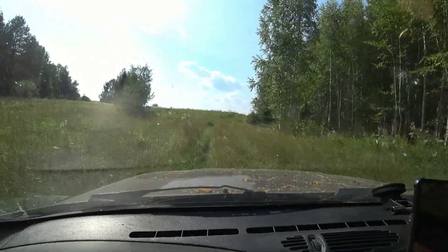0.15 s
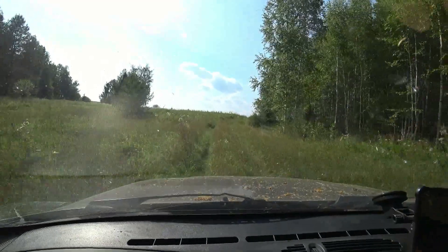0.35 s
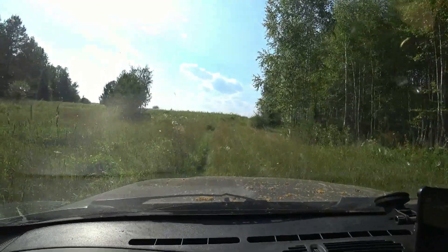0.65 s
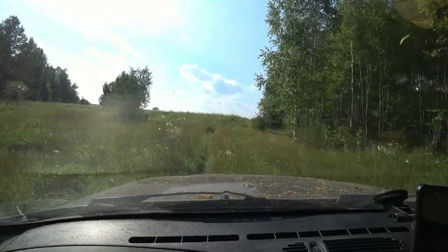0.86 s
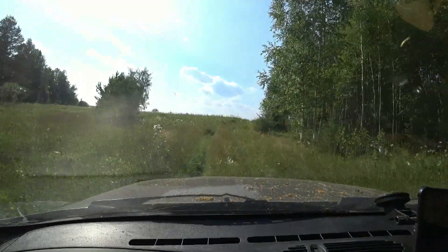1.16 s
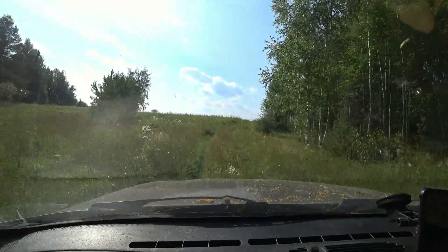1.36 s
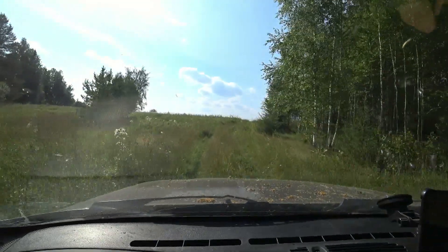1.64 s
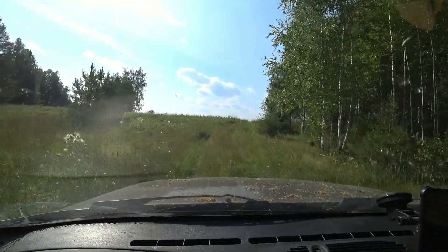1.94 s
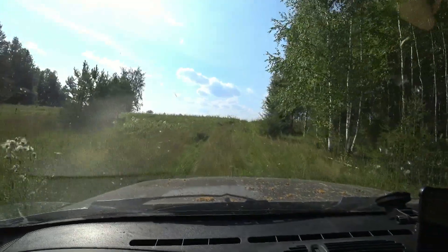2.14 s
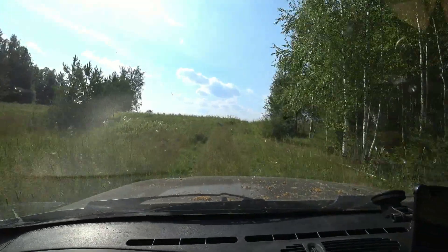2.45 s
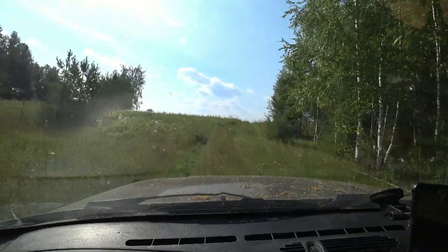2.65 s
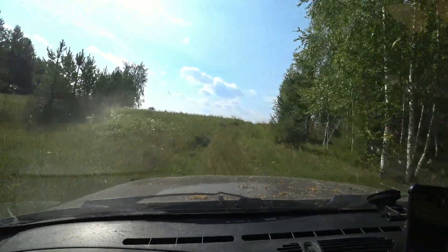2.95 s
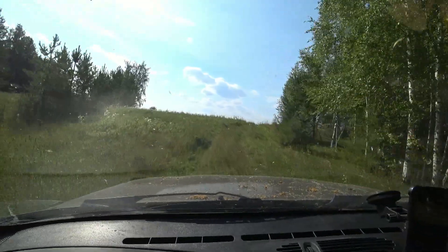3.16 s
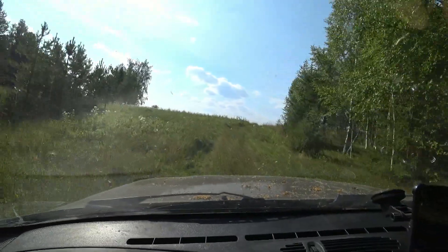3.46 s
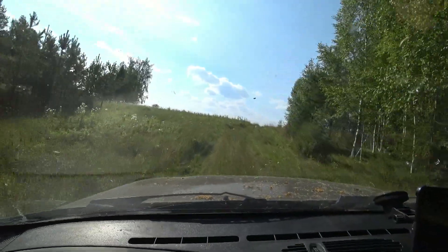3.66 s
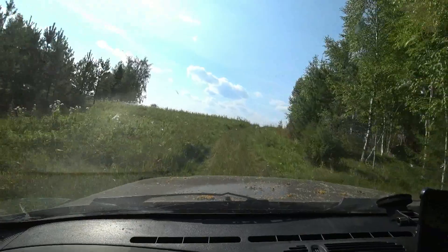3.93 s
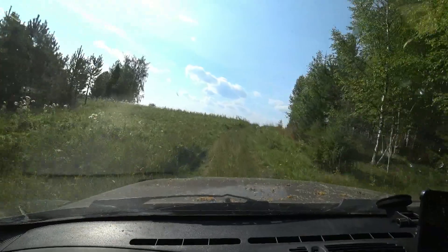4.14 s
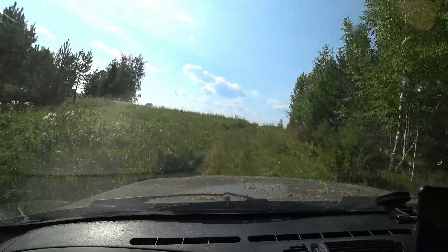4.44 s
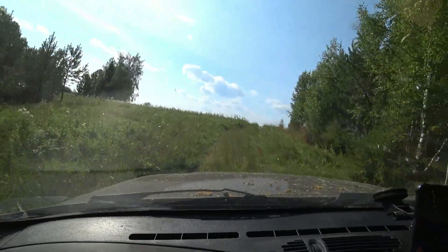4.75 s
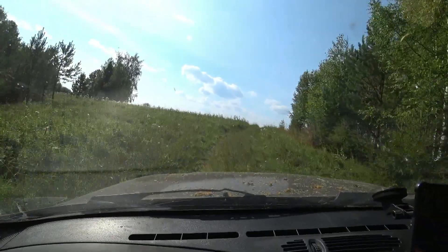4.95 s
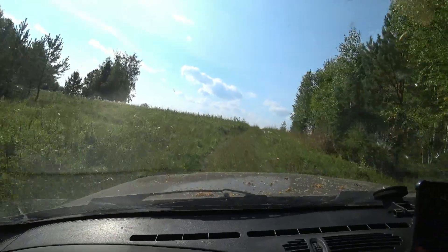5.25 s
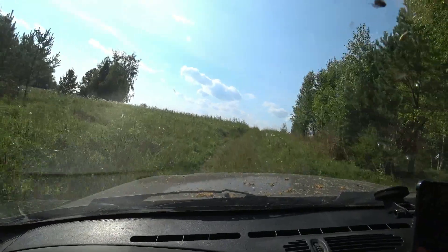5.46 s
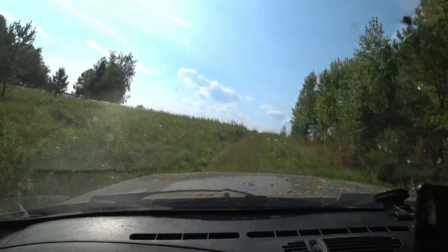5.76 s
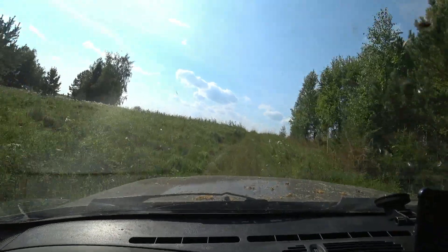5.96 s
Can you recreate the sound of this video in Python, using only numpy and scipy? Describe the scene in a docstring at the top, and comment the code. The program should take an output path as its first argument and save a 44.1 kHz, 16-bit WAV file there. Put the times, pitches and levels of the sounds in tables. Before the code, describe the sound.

Heard from the dashboard of a car creeping along a grassy track. A hard knock opens the scene while trim squeaks high and thin for under half a second. A deep engine boom lugs on with a wavering gear hum that fades midway and returns. Irregular knocks, dry clacks and plastic rattles continue over soft tyre rumble and faint grass swish.

```python
"""Inside an off-road car crawling along a bumpy grass track, its engine lugging at low revs.
It opens on hard knocks of a loose part, built from ringing body modes, while trim squeaks in stick-slip chirps.
The squeak lets go early; firing tones boom on and the modulated gear hum fades while the revs are lowest.
The hum then returns, and knocks, clacks of loose fittings and rattles of trim go on to the end.
Throughout, shaped noise makes the tyres rumble and roar and the grass swish."""
import sys
import numpy as np
from scipy import signal
from scipy.io import wavfile

SR = 44100
rng = np.random.default_rng(int(sys.argv[2]) if len(sys.argv) > 2 else 0)


def transcribe(u):
    """Save the signal u as a 16-bit wav file named by the first command-line argument.

    u: samples, shape (n,) or (channels, n), limited to [-1, 1]; the rate is SR.
    q: integer samples, one column per channel.
    """
    v = np.clip(np.atleast_2d(u).T, -1, 1)
    q = np.round(v * 32767).astype(np.int16)
    wavfile.write(sys.argv[1], SR, q)


N = 269010
TIME = np.arange(N) / SR  # s

# Table levels are relative: the functions add their own gains.
# engine speed: (time [s], firing rate [Hz])
FIRING_RATE = [(0.0, 36.56), (0.249, 34.84), (0.747, 34.28), (1.398, 31.98), (2.1, 30.65), (2.499, 29.96),
               (3.3, 30.13), (4.001, 31.9), (4.85, 33.94), (5.4, 32.77), (5.8, 32.73), (6.1, 30.95)]
# engine boom in the cabin: (time [s], level at the firing rate [dB], level of its octave [dB])
ENGINE_LEVELS = [(0.0, -27.5, -24), (0.45, -17.5, -39), (0.7, -29, -38), (1.15, -19, -27.5),
                 (1.5, -26.5, -24.5), (2.0, -21.5, -21.5), (2.55, -19, -18.5), (3.0, -15.5, -19),
                 (3.8, -18, -20.5), (4.7, -17, -27), (5.3, -16.5, -26), (5.55, -18.5, -27.5),
                 (6.1, -18.5, -19.5)]
# brief dips of the engine: (time [s], depth [dB])
ENGINE_DIPS = [(0.202, 11), (.36, 12), (.7, 0), (1.03, 5), (1.27, 4), (1.812, 4), (1.91, 6), (2.048, 3.5),
               (4.88, 7), (5.36, 15)]
# rocking of the engine: (multiple of the firing rate [ratio], level [dB])
ROCKING_ORDERS = [(.88, -32.5), (1.14, -31), (1.269, -29), (1.481, -37), (1.619, -35.5)]
# gear hum: (time [s], level [dB], throb depth [0-1], slow phase sway depth [rad])
GEAR_HUM = [(0, -32, 0.8, 0.27), (.35, -32.5, 0.5, 0.47), (1.25, -25, 0.5, .2), (1.65, -24.5, 0.04, 0.17),
            (2.22, -27, 0.6, 0.25), (2.36, -34, 0.53, 0.5), (3.2, -38.5, 0.85, 0.56),
            (3.6, -31, 0.62, 0.17), (4.4, -28.5, 0.51, 0.27), (5.75, -25.5, 0.42, 0.8),
            (6.1, -31, 0.6, 1.5)]
# knocks: (time [s], peak [dB], edge re peak [dB], thud re peak [dB], ring brightness [dB per octave])
BODY_KNOCKS = [(0.013, -7, -24, -11, 0), (0.045, -15, -27, -8, -13.5), (0.234, -23.5, -19, -21, 2.5),
               (0.84, -8.5, -25.5, -11.5, -1.5), (0.934, -26, -28, -26, -7.5),
               (1.433, -10.5, -22.5, -7.5, 1.2), (1.85, -26.5, -35, -6, -4), (2.133, -24.5, -24, 1, -1),
               (2.157, -27.5, -30, -14, 1), (2.307, -25.5, -39, -17, -7), (2.445, -19.5, -26, -8, -2),
               (2.944, -15, -28, -7, -2.5), (3.102, -17.5, -33, -16, -3), (3.202, -23.5, -32, -13, -2),
               (3.804, -25, -34, -3.5, -.3), (3.862, -27.5, -43, -10, -2), (4.475, -14.5, -30, -8.5, -2.5),
               (4.737, -27, -46, -34, -1), (4.831, -26, -19, -3, 3), (4.872, -24.5, -40, -7, 1),
               (4.978, -16.5, -30, -9, -2.5), (5.391, -15, -33, -13, -1), (5.693, -10, -22.5, -11, -1),
               (5.712, -18, -33, -12, -1), (5.803, -12.5, -21.5, -10, 0.3), (5.822, -23, -29, -18, -6)]
# body panel modes: (frequency [Hz], level [dB], T60 [s])
BODY_MODES = [(342, -14.5, 0.32), (395.3, -6.5, .12), (412.3, -7.5, .19), (442, -4.5, 0.11), (502, -9, .12),
              (524, -9, 0.029), (545.2, -9.5, 0.15), (625, -13.5, .12), (662, -22.5, .11),
              (742, -30.5, 0.12), (952, -19.5, 0.14), (1025, -14, 0.084), (1068, -17, 0.056),
              (1140, -21, .022), (1250, -19.5, 0.086), (1335, -22.5, 0.099), (1390, -38, 0.056),
              (1720, -26, 0.086), (1900, -32, 0.11), (2034, -25.5, .08), (2144, -30, 0.072)]
# low thud modes of the body: (frequency [Hz], level [dB], T60 [s])
THUD_MODES = [(154.8, -2.5, 0.41), (189.7, 1.5, 0.18), (233, -1, 0.035)]
# spectrum of the knocks' cabin tail: (frequency [Hz], density [dB per Hz])
TAIL_SPECTRUM = [(200, -36), (330, -4.5), (420, 5), (560, 13.5), (780, -17.5), (1020, -0.5), (1350, -3),
                 (1700, -18), (2100, -14.5), (2700, -27)]
# spectrum of the knocks' hard edge: (frequency [Hz], density [dB per Hz])
EDGE_SPECTRUM = [(900, 9), (1500, 8), (2100, -30), (2600, 5), (3200, 11.5), (4200, 11), (5200, 2.5),
                 (6800, 4), (8500, -16), (11000, -25)]
# decay of the cabin: (frequency [Hz], T60 [s])
CABIN_DECAY = [(200, 0.24), (500, 0.27), (1100, 0.17), (2500, 0.15), (8000, .07)]
# clacks of loose fittings: (time [s], level [dB], brightness [dB per octave])
FITTING_CLACKS = [(.265, -38, 1), (.336, -45, 3), (.484, -34, 1.5), (.699, -37.5, 6.5), (.751, -29, -3),
                  (.995, -45, 6.5), (2.104, -38.5, 4), (2.335, -48, 2), (2.904, -38, 2), (3.627, -37, .5),
                  (4.849, -32, 2), (5.290, -33, 1), (5.348, -32, 0.5), (5.861, -35, -2),
                  (6.008, -33.5, 3.5)]
# modes of the fittings: (frequency [Hz], level [dB], T60 [s])
FITTING_MODES = [(474, -3.5, 0.044), (650, -1.5, 0.04), (915, -3, 0.031), (1074, -2.5, 0.026),
                 (1265, -4, 0.037), (1508, -12, 0.045), (1774, -7, 0.019), (2270, -17, 0.018)]
# trim rattles: (time [s], level [dB], centre [Hz], width [Hz], T60 [s])
TRIM_RATTLES = [(.045, -44, 6500, 3000, .05), (.484, -50, 3700, 3000, 0.12), (0.692, -43, 4970, 4500, 0.18),
                (.756, -46, 5937, 1800, 0.055), (0.8777, -47.5, 2770, 701.6, 0.16),
                (1.502, -47.5, 6300, 2200, 0.03), (2.0121, -48.5, 3460, 700, 0.25),
                (2.042, -53, 3450, 890, 0.17), (2.146, -39.5, 3550, 500, 0.093),
                (2.15, -50, 5700, 1400, 0.3), (2.335, -41, 1520, 220, 0.12),
                (2.871, -38.5, 6297, 900, 0.05), (2.871, -44, 9000, 4030, 0.056),
                (2.875, -46, 2570, 690, 0.066), (2.904, -48, 6460, 2200, 0.046),
                (3.066, -49.5, 5000, 1800, 0.055), (3.557, -50, 5203, 2600, 0.048),
                (3.6266, -41, 3220, 900, 0.046), (4.129, -51.5, 6030, 2585, 0.084),
                (4.416, -51, 3285, 500, 0.13), (4.534, -58, 3380, 908, 0.035),
                (4.573, -46, 3390, 698.3, 0.027), (4.851, -43.5, 2870, 900, 0.075),
                (5.0458, -47, 2390, 900, 0.049), (5.231, -54.5, 3362, 1404, 0.25),
                (5.289, -43, 5203, 3400, 0.067), (5.35, -43, 2800, 1300, 0.076),
                (5.9, -51, 3940, 2400, .04), (6.007, -38.5, 2794, 450, 0.047),
                (6.009, -46, 3700, 1600, .05)]
# spectrum of the squeak's hiss: (frequency [Hz], density [dB per Hz])
SQUEAK_SPECTRUM = [(6000, -40), (7200, -17), (8500, 12), (9500, 16), (11000, -3), (14000, -5)]
# ground under the car: (time [s], body rumble [dB], tyre roar [dB], grass swish [dB])
GROUND_LEVELS = [(0.0, -27.5, -37, -51.5), (0.44, -31, -41.5, -52), (1.92, -33.5, -42.5, -55),
                 (2.38, -33, -42, -53.5), (2.92, -38, -43.5, -57), (4.01, -39.5, -43.5, -59),
                 (4.37, -33.5, -43, -58), (5.44, -36.5, -41.5, -57), (5.78, -35, -43, -59),
                 (6.1, -37, -41.5, -55.5)]
# spectrum of the body rumble: (frequency [Hz], density [dB per Hz])
RUMBLE_SPECTRUM = [(20, -19), (32, -8), (46, 5), (68, -17.5), (92, 2.5), (130, -2.5), (185, 0), (225, -1.5),
                   (260, -42), (330, -28), (450, -45)]
# spectrum of the tyre roar: (frequency [Hz], density [dB per Hz])
ROAR_SPECTRUM = [(200, -21), (290, 19.5), (340, 11), (420, 0.5), (500, 3), (640, 2), (800, -2.5),
                 (1000, -9.5), (1300, -12), (1700, -17), (2300, -25), (3200, -19)]
# spectrum of the grass swish: (frequency [Hz], density [dB per Hz])
SWISH_SPECTRUM = [(1000, 17.5), (1800, 6.5), (2600, 3), (3400, 3), (4800, 0.5), (6000, 4), (8000, -2),
                  (11000, -6), (14000, -26)]
# panels kept humming within the roar: (frequency [Hz], width [Hz], level [dB])
HUMMING_PANELS = [(409, 15.6, -13), (531, 29, -18.5), (684, 64, -12.5), (944, 250, -14), (2157, 200, -63),
                  (3370, 520, -26)]
# stereo likeness of noise: (frequency [Hz], likeness [0-1])
STEREO_LIKENESS = [(30, .99), (70, 1), (160, 0.74), (300, 0.63), (500, 0.35), (1000, 0.27), (3000, 0.54),
                   (9000, 0.47)]
# stereo balance: (frequency [Hz], left minus right [dB])
STEREO_BALANCE = [(30, -2.5), (70, -3), (180, -5.5), (330, -4.5), (600, -2), (1070, 0.5), (2000, .7),
                  (10000, 0.8)]
# stereo phase: (frequency [Hz], lead of the left [rad])
STEREO_LEAD = [(30, .04), (62, 0.19), (150, 0.56), (270, 1.51), (330, 0.61), (430, 0.72), (800, 0.33),
               (2000, 0.81)]

HALF_SPLIT = np.array([[.5], [-.5]])  # half of a stereo difference to each side

# waver of the boom: depth at its strongest (0-1), growth (dB per dB that the boom loses)
LOPE, LOPE_GROWTH = .08, 2.1
DIP_SPREAD_S = 0.027
# order just below the octave (per firing); phase wander as rates of drift and radians
BEAT_ORDER, BEAT_WANDER_PER_S, ROCKING_WANDER_RAD = 1.75, 1.2, 1.5
# gear hum: cycles per firing
MESH_PER_FIRING, SHAFT_TURNS_PER_FIRING, BEATS_PER_FIRING, SWAYS_PER_FIRING = 9.35, .239, .291, .112
FIRST_SWELL_S = 0.077
# slow wander in phase (rad); quick flutter in phase (rad) and level (share)
HUM_WANDER, HUM_FLUTTER = .45, .24
# bounces after each knock: spacing, its scatter (share), level, and changes to edge and thud
REBOUND_S, REBOUND_SCATTER, REBOUND_DB, BOUNCE_LOSS_DB = .017, 0.264, -21, 5.5
REBOUND_EDGE_DB, REBOUND_THUD_DB = -14, 13.5
# small random jolts; the tilt is the largest either way, per octave
JOLT_DB, JOLT_SPREAD_DB, JOLT_EDGE_DB, JOLT_THUD_DB, JOLT_TILT_DB = -34, 4, -35, -10, 2
FAINT_CLACK_DB, FAINT_CLACK_SPREAD_DB = -47, 3
# faint random ticks of the trim; their pitch spreads by the octaves either way
TICK_DB, TICK_SPREAD_DB, TICK_HZ, TICK_OCTAVES, TICK_WIDTH_HZ, TICK_T60_S = -56, 2.5, 4400, .7, 1800, .09
# the squeak grows steadily, then lets go
SQUEAK_START_DB, SQUEAK_END_DB, SQUEAK_END_S, SQUEAK_RELEASE_DB_PER_S = -48.5, -40, 0.448, 596
# each knock leaves the body shaking for a moment
SHUDDER_DB, SHUDDER_T60_S = -21, 0.6
TILT_PIVOT_HZ = 600
PEAK_LIMIT, FADE_S, CUTOFF_HZ = .85, .004, 11050  # the limit is in full scale


def engine(boom_gain_db=2.0, octave_gain_db=-2.0, shudder=0.22, beat_db=-12,
           overtone_db=-21, overtone_fall_db=4.0):
    """Slow firing pulses: a strong boom, a throbbing octave and weak, unsteady orders between and above them."""
    boom_db, octave_db = in_time(ENGINE_LEVELS)
    turn = firing_phase()
    hz = np.mean(np.array(FIRING_RATE)[:, 1])
    # the boom is firm under load and wavers more as it weakens
    waver = np.minimum(LOPE * from_db(LOPE_GROWTH * (boom_db.max() - boom_db)), 1)
    firmness = (1 + waver * (drift(25.6) + 1j * drift(12.0))) / np.sqrt(1 + 2 * waver ** 2)
    out = from_db(boom_db + boom_gain_db) * placed(firmness * np.exp(1j * turn), hz)
    # the octave throbs once in every four firings, against the order just below it
    lower_order = np.exp(1j * (BEAT_ORDER * turn + drift(BEAT_WANDER_PER_S)))
    octave = np.exp(2j * turn + 3j * np.pi / 4) + from_db(beat_db) * lower_order
    octave_level = from_db(octave_db + octave_gain_db) * (1 + shudder * drift(8.9))
    out += octave_level * placed(octave, 2 * hz)
    # unequal cylinders rock the engine on its mounts
    for multiple, db in ROCKING_ORDERS:
        strength = rms_one(abs(drift(3.9)) + 1)
        phase = multiple * turn + ROCKING_WANDER_RAD * drift(1.15)
        out += from_db(db) * placed(strength * np.exp(1j * phase), multiple * hz)
    for k in range(3, 8):
        level = from_db(octave_db + overtone_db - overtone_fall_db * (k - 3.5))
        out += level * drift(23.4) * placed(np.exp(1j * k * turn), k * hz)
    return np.sqrt(2) * from_db(-dip_db()) * out


def firing_phase():
    """Angle that advances one turn with each firing."""
    firing_hz, = in_time(FIRING_RATE)
    return 2 * np.pi * np.cumsum(firing_hz) / SR


def dip_db():
    """Level lost in the engine's brief, bell-shaped dips."""
    return sum(depth_db * np.exp(-.5 * ((TIME - s) / DIP_SPREAD_S) ** 2) for s, depth_db in ENGINE_DIPS)


def gearbox(level_db=0.0, beat=0.51, wobble=0.94, chatter_db=-41):
    """Gear teeth hum in step with the engine; an eccentric shaft swells the hum, against a faster beat."""
    mesh_db, throb, sway = in_time(GEAR_HUM)
    turn = firing_phase()
    shaft = SHAFT_TURNS_PER_FIRING * (turn - np.interp(FIRST_SWELL_S, TIME, turn))
    swell = 1 + throb * (np.cos(shaft) + beat * np.cos(BEATS_PER_FIRING * turn))
    # the drive winds up under load, so each shaft swell starts sharp and ends flat
    twist = wobble * throb * np.cos(shaft)
    twist -= sway * np.cos(SWAYS_PER_FIRING * turn)
    twist += HUM_WANDER * drift(1.55) + HUM_FLUTTER * drift(8.5)
    # the teeth chatter at a steady level, so the hum breaks up when it is weak
    hum = from_db(mesh_db + level_db) * swell * (1 + HUM_FLUTTER * drift(11.0))
    chatter = from_db(chatter_db) * (drift(16.6) + 1j * drift(16))
    mesh = np.exp(1j * (MESH_PER_FIRING * turn + twist))
    return np.sqrt(2) * placed((hum + chatter) * mesh, 273)


def knocks(ring_db=-2.5, thud_db=-2.5, clatter_db=-17.0, edge_db=-4, edge_t60=0.11, contact_s=0.00085):
    """A loose part hits the body and bounces: a hard edge, ringing panels, a low thud and a short cabin tail."""
    s, peak_db, hard_db, low_db, tilt_db = np.vstack([BODY_KNOCKS, *rebounds(count=2), jolts()]).T
    ring_s = s + contact_s
    panels = struck(BODY_MODES, ring_s, peak_db + ring_db, tilt_db, scatter_db=2.5, softness=1.88)
    thud = struck(THUD_MODES, ring_s, peak_db + low_db + thud_db, 0, scatter_db=1.5)
    hits = clicks(ring_s, from_db(peak_db + clatter_db))
    tail = noise(TAIL_SPECTRUM, lambda hz: dying(hits, at_hz(CABIN_DECAY, hz), rise_s=0.0011))
    crack = dying(clicks(s, from_db(peak_db + hard_db + edge_db)), edge_t60, rise_s=.0011)
    return panels + thud + tail + noise(EDGE_SPECTRUM, lambda hz: crack)


def rebounds(count):
    """Rows of knocks for each bounce: unevenly later, weaker, duller and with more thud."""
    rows = np.array(BODY_KNOCKS)
    gaps = REBOUND_S * (1 + REBOUND_SCATTER * rng.uniform(-1.03, 1, (len(rows), count)))
    bounces = []
    for k, delay in enumerate(np.cumsum(gaps, axis=1).T):
        later = np.outer(delay, [1, 0, 0, 0, 0])
        change = [0, REBOUND_DB - BOUNCE_LOSS_DB * k, REBOUND_EDGE_DB * (k + 1), REBOUND_THUD_DB, 0]
        bounces.append(rows + later + change)
    return bounces


def jolts(count=40):
    """Light, dull rows of knocks at random times: tufts and ruts nudge the same panels."""
    chance = rng.uniform([0, -1, -1], [N / SR, 1, 1], (count, 3))
    return [(s, JOLT_DB + JOLT_SPREAD_DB * size, JOLT_EDGE_DB, JOLT_THUD_DB, JOLT_TILT_DB * colour)
            for s, size, colour in chance]


def clacks(level_db=0.0, touch_s=0.0048, touch_loss_db=3.5, count=4):
    """Loose fittings jostle: each clack is a quick, uneven run of touches that ring their modes."""
    s, db, tilt_db = np.vstack([FITTING_CLACKS, faint_clacks()]).T
    touch = np.arange(count)
    times = s[:, None] + touch_s * touch * rng.uniform(.75, 1.25, (len(s), count))
    sizes_db = db[:, None] + level_db - touch_loss_db * touch
    tilts_db = np.repeat(tilt_db, count)
    return struck(FITTING_MODES, times.ravel(), sizes_db.ravel(), tilts_db, scatter_db=3.0, softness=1.6)


def faint_clacks(count=10):
    """Rows of clacks at random times, levels and brightness."""
    lowest = [0, FAINT_CLACK_DB - FAINT_CLACK_SPREAD_DB, -2]
    highest = [N / SR, FAINT_CLACK_DB + FAINT_CLACK_SPREAD_DB, 2]
    return rng.uniform(lowest, highest, (count, 3))


def rattles(level_db=2, touches_per_s=900, fizz=0.12, rise_s=0.00053, spread=0.46):
    """Pieces of plastic trim chatter in quick tiny touches, each through a resonance of its own."""
    count = SR // 4
    age = np.arange(count) / SR
    out = np.zeros((2, N + count))
    for s, db, centre_hz, width_hz, t60 in TRIM_RATTLES + faint_ticks():
        density = fizz + (rng.random(count) < touches_per_s / SR)
        touches = rng.standard_normal((2, count)) * density
        edges = [max(centre_hz - width_hz / 2, 100), centre_hz + width_hz / 2]
        resonance = signal.butter(2, edges, "band", fs=SR, output="sos")
        mid, side = signal.sosfilt(resonance, touches)
        envelope = from_db(db + level_db - 60 * age / t60) * (1 - np.exp(-age / rise_s))
        at = round(s * SR)
        out[:, at:at + count] += envelope * rms_one(widened(mid, spread * side))
    return out[:, :N]


def faint_ticks(count=7):
    """Rows of rattles at random times, levels and pitches."""
    chance = rng.uniform([0, -1, -1], [N / SR, 1, 1], (count, 3))
    return [(s, TICK_DB + TICK_SPREAD_DB * size, TICK_HZ * 2 ** (TICK_OCTAVES * pitch), TICK_WIDTH_HZ, TICK_T60_S)
            for s, size, pitch in chance]


def squeak(slips_per_s=52, unevenness=0.1, depth_db=5, chirp_hz=8900, chirp_wander_hz=700,
           chirp_db=-2, hiss_db=-3):
    """Rubbing trim sticks and slips in a run of tiny high chirps, each at a slightly different pitch."""
    level_db = np.interp(TIME, [0, SQUEAK_END_S], [SQUEAK_START_DB, SQUEAK_END_DB])
    level_db -= SQUEAK_RELEASE_DB_PER_S * np.clip(TIME - SQUEAK_END_S, 0, .5)
    slip = 2 * np.pi * np.cumsum(slips_per_s * (1 + unevenness * drift(30))) / SR
    strength = from_db(level_db + depth_db * (np.sin(slip) - 1.5))
    chirp = np.exp(2j * np.pi * np.cumsum(chirp_hz + chirp_wander_hz * drift(93)) / SR)
    hiss = noise(SQUEAK_SPECTRUM, lambda hz: from_db(hiss_db))
    return strength * (from_db(chirp_db) * placed(chirp, chirp_hz) + hiss)


def ground(rumble_gain_db=0, roar_gain_db=4, panel_gain_db=4, swish_gain_db=4,
           lumps_db=2.0, tufts_db=1.73, stalks_db=1.5):
    """Tyres shake the body and roar over tufts while grass brushes the underside."""
    rumble_db, roar_db, swish_db = in_time(GROUND_LEVELS)
    s, peak_db = np.transpose(BODY_KNOCKS)[:2]
    shudder = dying(clicks(s, from_db(peak_db + SHUDDER_DB)), SHUDDER_T60_S)
    shake = np.hypot(from_db(rumble_db), shudder)
    bumps = drift(27)  # shared, so all three layers surge together
    rumble = noise(RUMBLE_SPECTRUM, lambda hz: from_db(rumble_gain_db + lumps_db * bumps))
    roar = noise(ROAR_SPECTRUM, lambda hz: from_db(roar_gain_db + tufts_db * (bumps + 0.5 * drift(25))))
    roar += from_db(panel_gain_db + tufts_db * bumps) * humming_panels()
    swish = noise(SWISH_SPECTRUM, lambda hz: from_db(swish_gain_db + stalks_db * (0.67 * bumps + drift(5.1))))
    return shake * rumble + from_db(roar_db) * roar + from_db(swish_db) * swish


def humming_panels():
    """Random jolts, as white noise, keep the panel resonances sounding."""
    out = 0
    for hz, width_hz, db in HUMMING_PANELS:
        pole = np.exp((-np.pi * width_hz + 2j * np.pi * hz) / SR)
        # two broader poles in a row give steep skirts
        broad_pole = pole * abs(pole) ** .5
        wave = signal.lfilter([1], np.poly([broad_pole] * 2), rng.standard_normal(N))
        out = out + from_db(db) * rms_one(placed(wave, hz))
    return out


def struck(modes, times, peak_db, tilt_db, scatter_db, softness=2.4):
    """Each blow rings every mode at its own strength, tilted by brightness; a padded contact rounds the start."""
    out = 0
    for hz, mode_db, t60 in modes:
        colour_db = tilt_db * np.log2(hz / TILT_PIVOT_HZ) + scatter_db * rng.standard_normal(len(times))
        hits = clicks(times, from_db(peak_db + mode_db + colour_db))
        padding = signal.butter(3, softness * hz, fs=SR, output="sos")
        push = signal.sosfilt(padding, hits + 1e-18)
        pole = from_db(-60 / (t60 * SR)) * np.exp(2j * np.pi * hz / SR)
        out = out + placed(signal.lfilter([1], [1, -pole], push), hz)
    return out


def noise(spectrum, envelope):
    """Third-octave stereo noise, of unit power before each band is multiplied by envelope(Hz)."""
    edges = 18 * 2 ** (np.arange(30) / 3)
    white = rng.standard_normal((2, 2, N))  # two pairs, used by alternate bands
    out, power = 0, 0
    for k, (low, high) in enumerate(zip(edges, edges[1:])):
        hz = np.sqrt(low * high)
        if spectrum[0][0] <= hz <= spectrum[-1][0]:
            band = signal.butter(3, [low, high], "band", fs=SR, output="sos")
            mid, side = signal.sosfilt(band, white[k % 2])
            alike = np.clip(at_hz(STEREO_LIKENESS, hz), 0, 1)
            gain = from_db(at_hz(spectrum, hz))
            pair = widened(mid, np.sqrt((1 - alike) / (1 + alike)) * side)
            out = out + gain * envelope(hz) * pair * from_db(at_hz(STEREO_BALANCE, hz) * HALF_SPLIT)
            power += gain ** 2 * (high - low) * 2 / SR
    return out / np.sqrt(power)


def placed(wave, hz):
    """Standing waves in the cabin give a complex tone its own level and phase on each side."""
    level = from_db(HALF_SPLIT * at_hz(STEREO_BALANCE, hz))
    lead = np.exp(1j * HALF_SPLIT * at_hz(STEREO_LEAD, hz))
    return np.imag(wave * level * lead)


def widened(mid, side):
    """Left and right from a shared signal and a difference signal."""
    return mid + side * [[1], [-1]]


def dying(hits, t60, rise_s=.0015):
    """Envelope of hits that take a moment to build up and whose energy dies away exponentially."""
    soft = np.exp(-1 / (rise_s * SR))
    energy = signal.lfilter([1], [1, -from_db(-120 / (t60 * SR))], hits ** 2 + 1e-18)
    return signal.lfilter([1 - soft], [1, -soft], np.sqrt(energy))


def clicks(times, sizes):
    """One single-sample click at each time."""
    out = np.zeros(N)
    at = np.round(np.asarray(times) * SR).astype(int)
    np.add.at(out, np.clip(at, 0, N - 1), sizes)
    return out


def drift(rate):
    """Smooth random movement of unit power: noise through two low-pass poles at the rate in Hz."""
    # drawn at every 40th sample, with a run-in that is thrown away
    r = np.exp(-80 * np.pi * rate / SR)
    slow = signal.lfilter([1], [1, -2 * r, r * r], rng.standard_normal(N // 40 + 2002))[2000:]
    return np.interp(np.arange(N) / 40, np.arange(len(slow)), rms_one(slow))


def in_time(rows):
    """Each column of a curve at every sample."""
    s, *columns = np.transpose(rows)
    return [np.interp(TIME, s, c) for c in columns]


def at_hz(points, hz):
    """Read a table on a log-frequency axis."""
    table_hz, values = np.array(points).T
    return np.interp(np.log(hz), np.log(table_hz), values)


def from_db(db):
    """Decibels to gain."""
    return 10 ** (np.asarray(db) / 20)


def rms_one(x):
    """Scale to unit power."""
    return x / np.sqrt(np.mean(x ** 2) + 1e-20)


def scene():
    """Everything as heard at the dashboard."""
    return engine() + gearbox() + knocks() + clacks() + rattles() + squeak() + ground()


def record(dry):
    """Round off the highest peaks, fade out the very end and cut off the top steeply."""
    rounded = dry / (1 + (dry / PEAK_LIMIT) ** 8) ** (1 / 8)
    fade = np.minimum(TIME[::-1] / FADE_S, 1)
    top_cut = signal.ellip(12, .1, 80, CUTOFF_HZ, fs=SR, output="sos")
    return signal.sosfilt(top_cut, rounded * fade)


dry = scene()
out = record(dry)
transcribe(out)
```